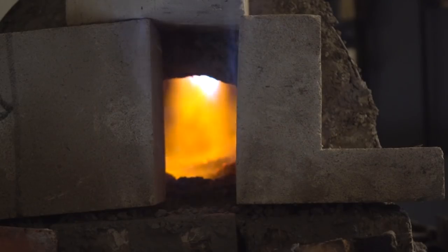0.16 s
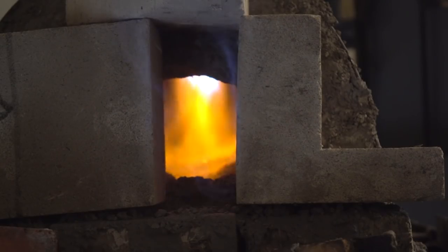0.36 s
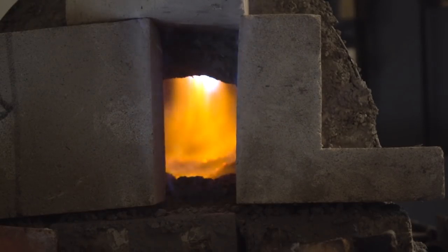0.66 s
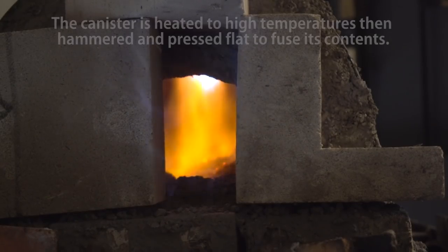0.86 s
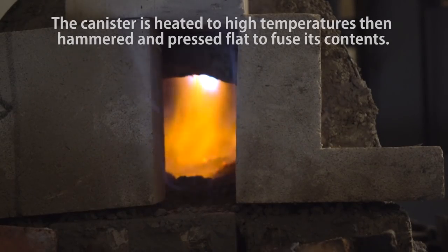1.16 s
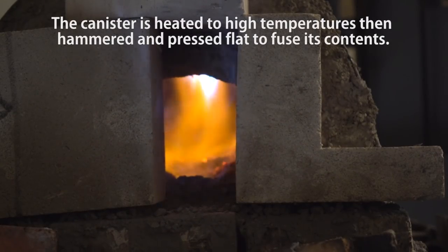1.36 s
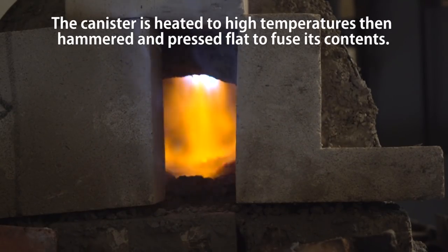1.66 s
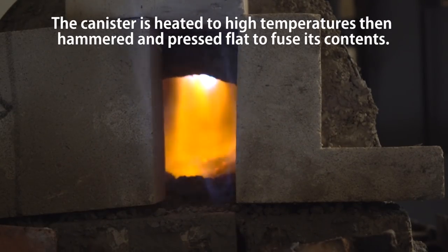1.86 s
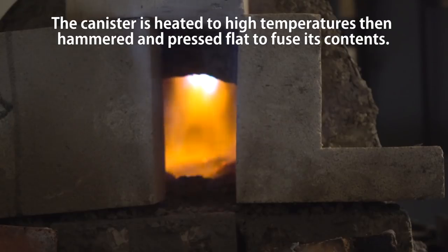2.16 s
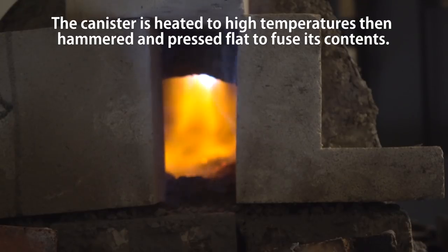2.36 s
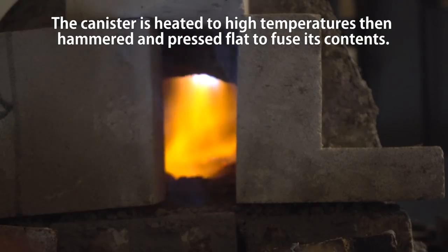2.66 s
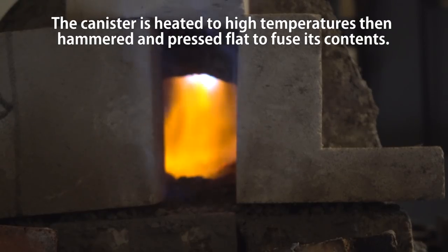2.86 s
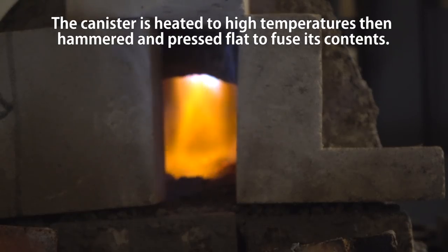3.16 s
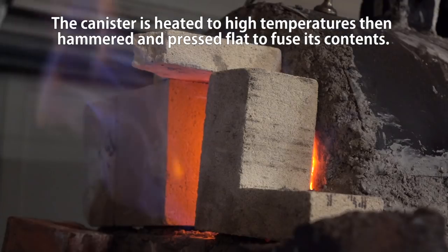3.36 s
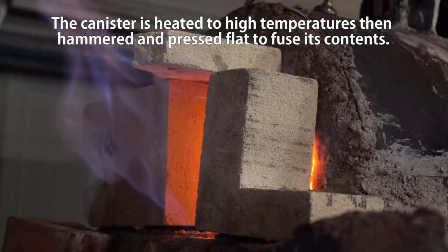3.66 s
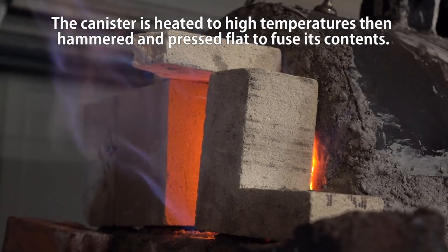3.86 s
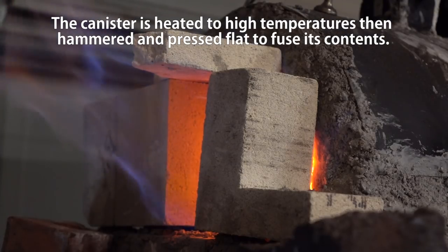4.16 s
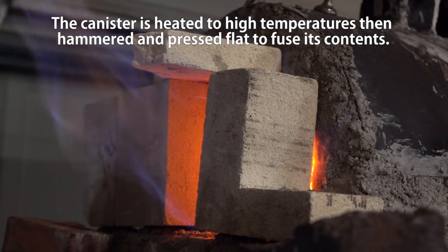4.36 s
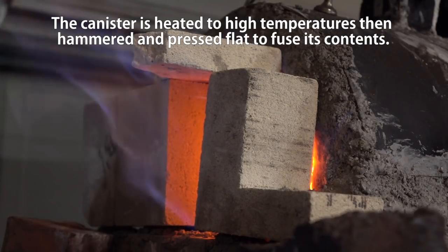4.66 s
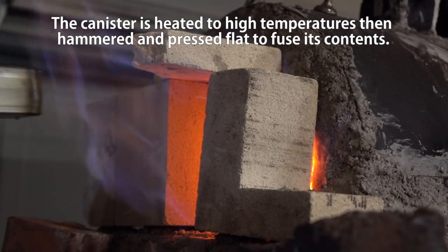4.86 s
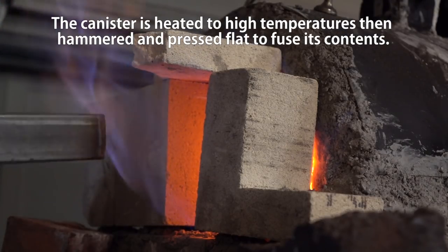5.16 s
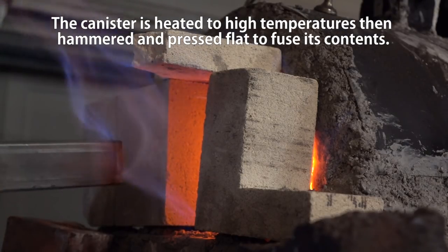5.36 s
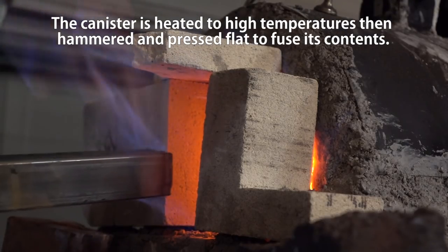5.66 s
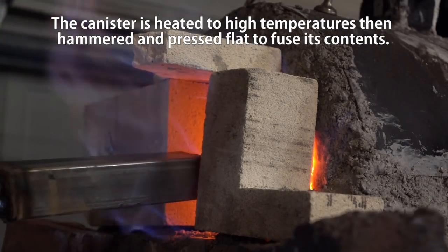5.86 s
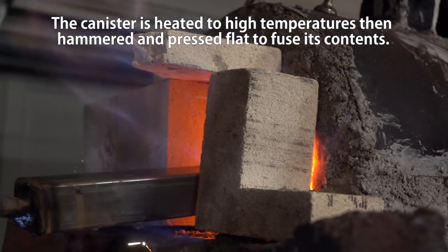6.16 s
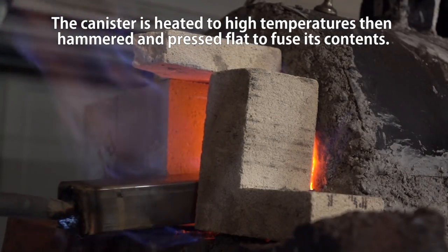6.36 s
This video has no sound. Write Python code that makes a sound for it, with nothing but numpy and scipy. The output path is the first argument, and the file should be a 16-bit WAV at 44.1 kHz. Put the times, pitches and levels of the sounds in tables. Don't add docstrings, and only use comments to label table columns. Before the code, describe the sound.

Continuous gas burner in a brick chamber, low and rumbling, its airy jet quivering with quick small dips. It opens on a clipped motor hum lasting an instant. Small pings of hot metal and a cracking tick sit barely above the roar. Around the midpoint the sound smoothly shifts to a softer side position with more room echo, where a door creaks faintly twice. Stereo pair, gentle automatic levelling.

```python
import sys
import numpy as np
from scipy import signal
from scipy.fft import rfft, irfft, next_fast_len
from scipy.io import wavfile
from scipy.ndimage import uniform_filter1d, map_coordinates

SR = 44100
rng = np.random.default_rng(int(sys.argv[2]) if len(sys.argv) > 2 else 0)


def unload_wav(signal):
    wavfile.write(
        sys.argv[1],
        SR,
        np.round(np.clip(np.atleast_2d(signal).T, -1, 1) * 32767).astype(np.int16),
    )


def gain_from_db(level_db):
    decades = np.asarray(level_db, float) / 20
    return 10 ** decades


N = 287532
CUT_S = 0.0285

# (frequency [Hz], width [Hz], front lift [dB], side lift [dB])
TUBE_MODES = [(1006, 140, 2.5, 8), (1276, 136, 7.5, 1), (1470, 66, 5.5, -1.5), (1648, 220, 7, 5),
              (1955, 65, 5, 4), (2250, 57, 3, 2.5), (2480, 96, 3, 5.5), (3170, 220, 3.5, 3.5),
              (3800, 330, 2, -3), (4680, 190, 5.5, 5), (6360, 300, 7, 5), (6600, 160, -8, -2),
              (7380, 840, 5.5, 5.5), (8530, 180, 7.5, 1.5), (8720, 130, .4, 3), (10350, 200, 0, -1),
              (10700, 200, 0, 1), (11500, 500, -1, -2.5), (12200, 320, 4, .3), (13250, 800, 5, 5),
              (14100, 250, 7, 7), (15200, 500, 9.5, 5), (15560, 300, 3, 4)]


def unit(x):
    return x / np.sqrt(np.mean(x ** 2) + 1e-20)


def along(points, hz):
    f, v = np.transpose(points)
    return np.interp(np.log(hz + 1), np.log(f + 1), v)


def wobble(rate_hz):
    knots = rng.standard_normal(int(N * rate_hz / SR) + 4)
    return unit(map_coordinates(knots, [np.arange(N) * rate_hz / SR]))


def filtered(x, response):
    m = next_fast_len(N + 8192)
    return irfft(rfft(x, m) * response(np.fft.rfftfreq(m, 1 / SR)), m)[..., :N]


def bells_db(events):
    t = np.arange(N) / SR
    coarse = t[::64]
    curve = sum(db * np.exp(-(2.7 * (coarse - at) / length) ** 2) for at, db, length in events)
    return np.interp(t, coarse, curve)


def motor():
    # (frequency [Hz], level [dB rms])
    whine = [(549.1, -40), (721.4, -55), (1098, -39.5), (1432, -48), (1798, -59), (2105, -57), (3273, -74),
             (4430, -64)]
    # (frequency [Hz], level [dB per Hz])
    whirr = [(150, -34), (400, -7), (1200, -12), (2400, -14), (5000, -23), (10000, -26), (15600, -31)]
    t = np.arange(N) / SR
    tones = sum(gain_from_db(db + 2.0) * np.cos(2 * np.pi * hz * (t - 0.0125)) for hz, db in whine)
    noise = rng.standard_normal((2, N)) + 1.1 * rng.standard_normal(N)
    air = unit(filtered(noise, lambda hz: gain_from_db(along(whirr, hz))))
    return (tones + gain_from_db(-46.5) * air) * np.clip((CUT_S - t) / 0.0019, 0, 1)


def ticks():
    # (time [s], peak [dB])
    cracks = [
        (2.7985, -42),
    ]
    out, t = np.zeros((2, N + SR)), np.arange(SR // 10) / SR
    for s, db in cracks:
        snap = gain_from_db(-60 * t / 0.012) * rng.standard_normal(len(t))
        tail = 0.59 * gain_from_db(-60 * t / 0.12) * rng.standard_normal((2, len(t)))
        out[:, round(s * SR):][:, :len(t)] += gain_from_db(db - 4.5) * (snap + tail)
    return filtered(out[:, :N], lambda hz: hz ** 2 / (hz ** 2 + 2500 ** 2))


def pings():
    # (time [s], peak [dB], frequency [Hz])
    slips = [
        (0.4833, -46, 2250),
        (1.1827, -43, 2250),
        (2.7194, -47, 2270),
    ]
    # (time [s], peak [dB], frequency [Hz])
    creaks = [
        (4.832, -43, 1000),
        (6.128, -44, 980),
    ]
    out, t = np.zeros(N + SR), np.arange(SR // 10) / SR
    for s, db, hz in slips + creaks:
        ring = np.sin(2 * np.pi * hz * t) + 0.55 * np.sin(2 * np.pi * 1.13 * hz * t)
        envelope = gain_from_db(db - 1 - 60 * t / 0.07) * (1 - np.exp(-t / 0.002))
        out[round(s * SR):][:len(t)] += envelope * ring
    return out[:N]


def walls(t60_s, shared):
    t = np.arange(SR // 4) / SR
    noise = shared * rng.standard_normal(len(t)) + rng.standard_normal((2, len(t)))
    tail = noise * gain_from_db(-60 * t / t60_s) * (t > 0.003)
    return tail / np.linalg.norm(tail, axis=1, keepdims=True)


def lift_db(modes, place, hz):
    return sum(m[2 + place] / (1 + (2 * (hz - m[0]) / m[1]) ** 2) for m in modes)


def heard(spectrum, modes, place, tail, patchy_db):
    # (frequency [Hz], likeness [0-1])
    alike = [
        [(60, .997), (180, .99), (300, .97), (640, .96), (1400, .86), (3100, .56), (6800, .28), (15000, .4)],
        [(60, .997), (180, .99), (300, .95), (640, .92), (1400, .9), (3100, .77), (6800, .64), (15000, .58)],
    ]
    # (frequency [Hz], phase [rad])
    lead = [
        [(40, .25), (100, .3), (230, .58), (420, .15), (600, .5), (850, .15), (2500, .7), (7000, .6), (15000, .6)],
        [(40, .25), (150, .45), (420, .5), (1200, .15), (3200, .4), (6500, -.4), (15000, -1.2)],
    ]
    # (frequency [Hz], level [dB])
    left = [
        [(60, 4.5), (110, -0.5), (200, 2), (380, 2), (700, 0), (1290, 0.5), (2380, -0.5), (4400, 2), (8120, -1.5), (15000, 4.5)],
        [(60, -2.5), (110, 4.5), (200, 1), (380, 2), (700, 2), (1290, 0.5), (2380, -1), (4400, -1.5), (8120, -1.5), (15000, 1)],
    ]
    # (frequency [Hz], level [dB])
    echo = [(250, -29), (500, -12.5), (1500, -9), (4000, -4), (12000, -15)]
    stay = round(3.8 * SR)
    size = next_fast_len(stay + SR // 3)

    z = signal.stft(rng.standard_normal((2, stay)), nperseg=512)[2]
    field = uniform_filter1d(rng.standard_normal(z.shape[1:]), size=8, axis=0)
    field = uniform_filter1d(field, size=8, axis=1)
    patchy = signal.istft(z * gain_from_db(patchy_db * unit(field)), nperseg=512)[1]
    common, apart = rfft(patchy, size)

    hz = np.fft.rfftfreq(size, 1 / SR)
    sign = np.array([[1], [-1]])
    spread = np.arccos(np.clip(along(alike[place], hz), -1, 1)) / 2
    source = np.cos(spread) * common + sign * np.sin(spread) * apart
    ports = gain_from_db(sign * along(left[place], hz) / 2) * np.exp(1j * sign * along(lead[place], hz) / 2)
    room = 1 + gain_from_db(along(echo, hz)) * rfft(tail, size)
    colour = gain_from_db(along(spectrum[place], hz) + lift_db(modes, place, hz))
    both = irfft(colour * room * ports * source, size)[:, 2048:stay]
    rest = N - both.shape[1]
    return np.pad(both / np.std(both.mean(axis=0)), ((0, 0), (rest * place, rest * (1 - place))))


def dissolve_rad():
    # (start [s], end [s])
    span = (3.12, 3.74)
    t = np.arange(N) / SR
    return np.pi / 2 * np.clip((t - span[0]) / (span[1] - span[0]), 0, 1)


def layer(spectrum, modes, tails, patchy_db):
    angle = dissolve_rad()
    front = heard(spectrum, modes, 0, tails[0], patchy_db)
    side = heard(spectrum, modes, 1, tails[1], patchy_db)
    return np.cos(angle) * front + np.sin(angle) * side


def strength(levels, drift_db):
    front_db, side_db, follows = levels
    return gain_from_db(np.interp(dissolve_rad(), (0, np.pi / 2), (front_db, side_db)) + follows * drift_db)


def gas_flow():
    # (time [s], level [dB])
    jet = [(0.06, -58), (0.17, -57.5), (0.47, -57.5), (0.51, -57), (0.67, -59), (0.87, -57), (1.08, -57.5),
           (1.78, -57), (2.55, -59), (2.7, -57.5), (2.93, -58.5), (3.31, -57), (3.4, -58), (5.17, -58.5),
           (5.28, -61), (5.3, -59), (5.6, -58), (6.5, -58.5)]
    # (time [s], rise [dB], length [s])
    surges = [
        (0.1, 1, .12),
        (0.84, 0.5, .15),
        (1.36, 1, .15),
        (1.8, 1.5, .1),
        (3.33, 1, .08),
        (3.95, 1, .15),
        (4.35, 0.5, .1),
    ]
    # (time [s], depth [dB], length [s])
    gasps = [(0.068, -12, 0.013), (0.345, -3.5, 0.043), (0.452, -6, 0.04), (0.6, -5, 0.03),
             (0.679, -6, 0.046), (1.22, -5, 0.046), (1.259, -5, 0.025), (1.435, -5, 0.058),
             (1.673, -6.5, 0.025), (1.863, -7, 0.035), (2.076, -4, 0.019), (2.11, -5, 0.016),
             (2.156, -8, 0.022), (2.265, -4.5, 0.035), (2.379, -8, 0.02), (2.447, -10, 0.03),
             (2.57, -7, 0.03), (2.773, -6, 0.026), (2.945, -2, 0.05), (3.051, -4.5, 0.016),
             (3.24, -4, 0.02), (3.849, -3, 0.043), (4.02, -5, 0.036), (4.16, -3.5, 0.045),
             (4.809, -6, 0.017), (4.876, -5, 0.023), (5.046, -3, 0.04), (5.255, -3, 0.044),
             (6.086, -4, 0.02), (6.34, -3, 0.027)]
    jet_db = np.interp(np.arange(N) / SR, *np.transpose(jet)) + bells_db(surges)
    gasp_db = bells_db(gasps)
    flutter_db = 0.23 * wobble(30) + 0.91 * wobble(160) + 0.69 * (gasp_db - gasp_db.mean())
    return jet_db - jet_db.mean(), flutter_db


def steadied(x, seconds, grip):
    power = np.mean(x ** 2, axis=0)
    width = round(seconds * SR)
    quick = np.abs(uniform_filter1d(uniform_filter1d(power, width), width))
    even = x * (quick + 0.14) ** (-grip / 2)
    return even / np.std(even.mean(axis=0))


def fizz(drift_db, flutter_db, tails):
    # (frequency [Hz], level [dB per Hz])
    spectrum = [
        [(3180, -32), (5400, -2), (5800, -7), (7470, -2), (11100, -4), (12500, -4), (15600, -9)],
        [(3180, -37), (5400, -8.5), (7570, -3), (9440, -5.5), (11800, -5), (13600, -6), (15600, -8.5)],
    ]
    # (front [dB], side [dB], follow [dB per dB of jet])
    levels = (-64, -63.5, 1.1)
    # (time [s], rise [dB], length [s])
    spits = [
        (1.51, 3, .14),
        (3.33, 1, .1),
    ]
    gain = strength(levels, drift_db) * gain_from_db(0.78 * flutter_db + bells_db(spits))
    return gain * layer(spectrum, TUBE_MODES, tails, patchy_db=0.6)


def hiss(drift_db, flutter_db, tails):
    # (frequency [Hz], level [dB per Hz])
    spectrum = [
        [(1650, -35), (2800, -7), (3170, -3.5), (3800, -3), (4980, -16.5), (5800, -19), (7540, -45), (12800, -120)],
        [(1650, -39), (2800, -4), (3840, 6), (4380, -8), (4800, -5), (5800, -15), (7540, -44), (12800, -120)],
    ]
    # (front [dB], side [dB], follow [dB per dB of jet])
    levels = (-60.5, -62, 1)
    gain = strength(levels, drift_db) * gain_from_db(0.7 * flutter_db)
    return gain * layer(spectrum, TUBE_MODES, tails, patchy_db=0.8)


def rush(drift_db, flutter_db, tails):
    # (frequency [Hz], level [dB per Hz])
    spectrum = [
        [(470, -21), (800, -5.5), (2030, -13.5), (2300, -10.5), (2780, -19.5), (3300, -27.5), (4290, -53), (7260, -120)],
        [(470, -42), (800, -9.5), (1410, -5), (2310, -10.5), (2500, -8.5), (3300, -20), (4290, -45), (7260, -120)],
    ]
    # (front [dB], side [dB], follow [dB per dB of jet])
    levels = (-48.5, -54, .7)
    gain = strength(levels, drift_db) * gain_from_db(0.92 * flutter_db)
    return gain * layer(spectrum, TUBE_MODES, tails, patchy_db=-0.1)


def roar(drift_db, tails):
    # (frequency [Hz], level [dB per Hz])
    spectrum = [
        [(15, -63), (25, -36), (58, -15), (183, 0.5), (253, -5.5), (291, -2), (334, -6.5), (507, -11.5), (620, -9.5), (781, -19.5), (1000, -22), (1300, -61), (2200, -120)],
        [(15, -75), (25, -48), (49, -23.5), (96, -17), (113, -11), (183, -7), (224, -6.5), (300, -6.5), (361, -12), (448, -10.5), (1000, -26.5), (1300, -55), (2200, -120)],
    ]
    # (frequency [Hz], width [Hz], front lift [dB], side lift [dB])
    low_modes = [(40, 10, 1, 0), (63, 13, 8, 15), (83.8, 14, 6, 5.5), (99.5, 9.8, -1.5, -6.5),
                 (129.2, 20.2, 8.5, 7.5), (158, 7.8, -3, -14), (178.2, 23.6, 6.5, 10),
                 (203.2, 17, 7.5, 9.5), (232.9, 9.4, 9.5, 10.5), (263.5, 7.6, 7.5, 8),
                 (287.1, 15, 11.5, 11), (314, 6.8, 6.5, 9.5), (344.7, 15, 5, 4), (365, 6.3, 2, 0),
                 (403, 58, 4.5, 6), (440, 20, 5.5, 1), (470, 7.8, 7, -0.5), (503, 16, 2.5, 3),
                 (546.6, 24, 2.5, 6.5), (577, 15, 2.5, -6), (613, 32, 4, 0), (680, 20, 2.5, 3),
                 (778, 33, 0, 3), (824, 30, 1, -7)]
    # (front [dB], side [dB], follow [dB per dB of jet])
    levels = (-27.5, -33, 0.073)
    # (time [s], depth [dB], length [s])
    lulls = [
        (2.39, -2.5, 0.058),
        (2.55, -2.5, 0.096),
        (3.25, -1, 0.47),
        (3.76, -2, 0.089),
        (4.13, -0.7, .1),
        (5.25, -0.5, .05),
        (5.85, -4, 0.05),
        (6.1, -2, 0.33),
    ]
    even = steadied(layer(spectrum, low_modes, tails, patchy_db=-0.32), seconds=0.015, grip=0.41)
    return strength(levels, drift_db) * gain_from_db(bells_db(lulls)) * even


def forge():
    drift_db, flutter_db = gas_flow()
    tails = walls(t60_s=0.22, shared=0.84), walls(t60_s=0.36, shared=1.6)
    jet = rush(drift_db, flutter_db, tails) + hiss(drift_db, flutter_db, tails)
    flame = roar(drift_db, tails) + jet + fizz(drift_db, flutter_db, tails)
    return flame * np.clip((np.arange(N) / SR - CUT_S) / 0.0025, 0, 1)


def scene():
    return motor() + ticks() + pings() + forge()


def band_limit(x):
    return signal.sosfilt(signal.butter(12, 15740, fs=SR, output="sos"), x)


def record(dry):
    power = np.mean(dry ** 2, axis=0)
    pole = 1 / (0.012 * SR)
    recent = signal.lfilter([pole], [1, pole - 1], power)
    usual = np.abs(uniform_filter1d(power, size=SR // 3))
    swell = (recent + 1e-6) / (usual + 1e-6)
    return band_limit(dry * np.clip(swell, 0.6, 9) ** -0.09)


dry = scene()
out = record(dry)
unload_wav(out)
```